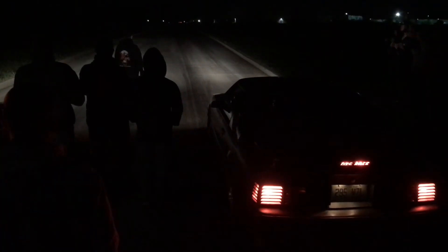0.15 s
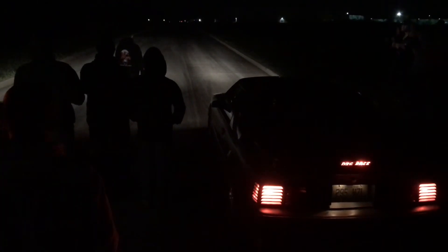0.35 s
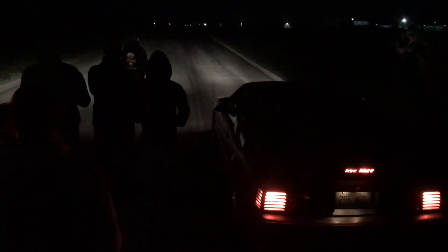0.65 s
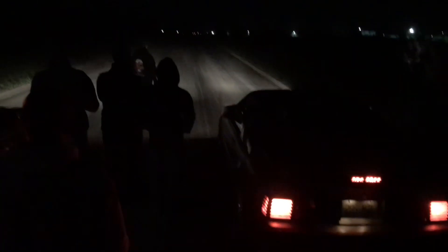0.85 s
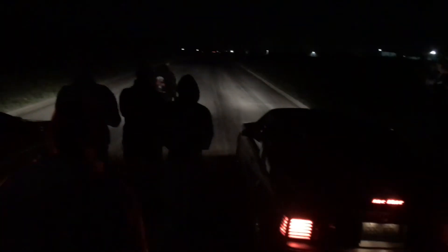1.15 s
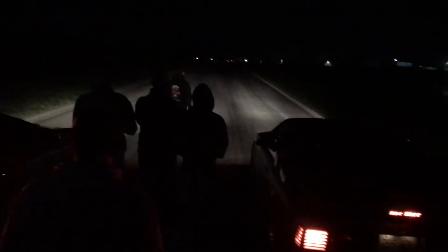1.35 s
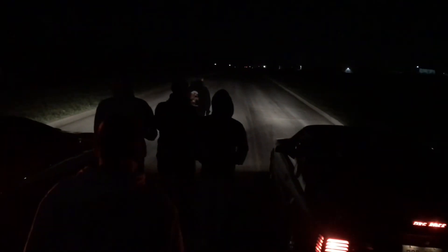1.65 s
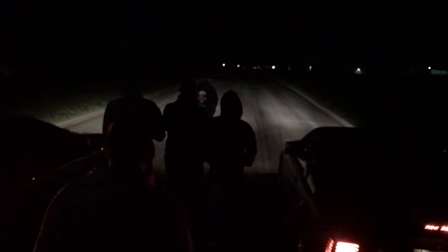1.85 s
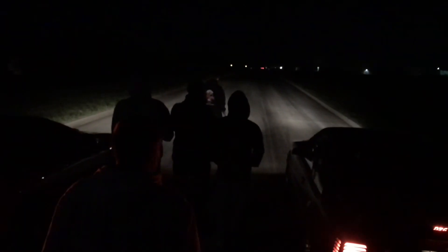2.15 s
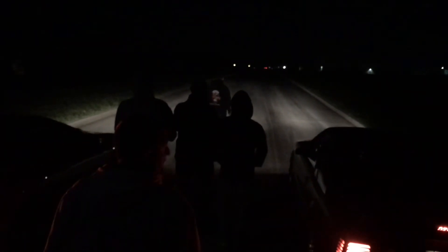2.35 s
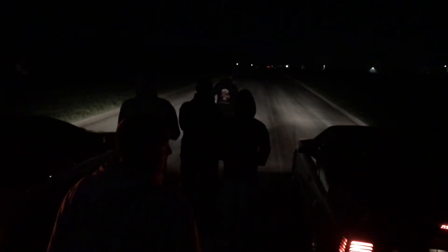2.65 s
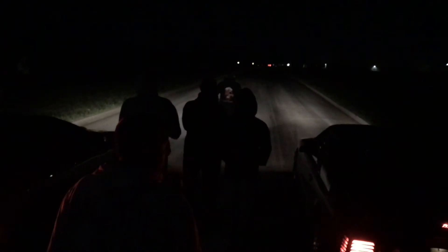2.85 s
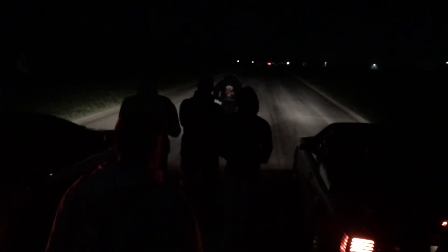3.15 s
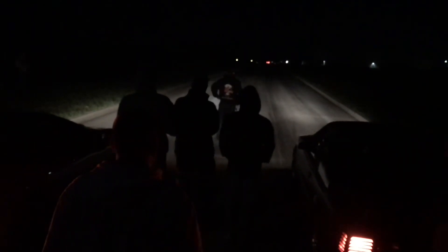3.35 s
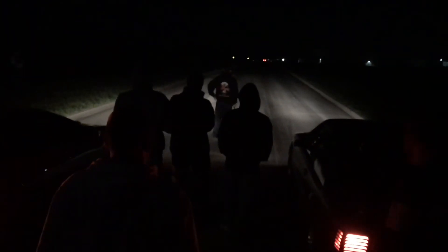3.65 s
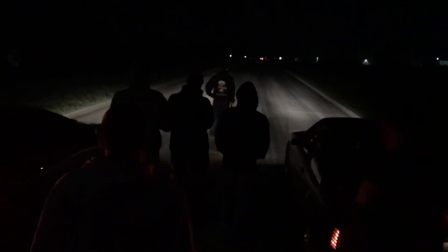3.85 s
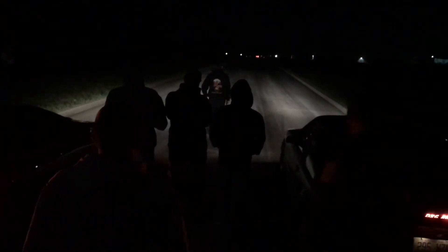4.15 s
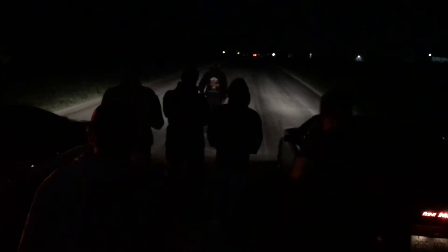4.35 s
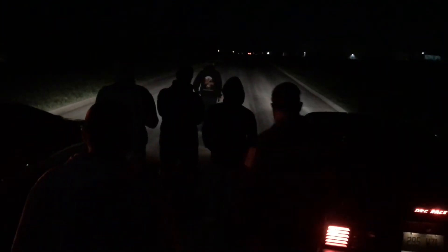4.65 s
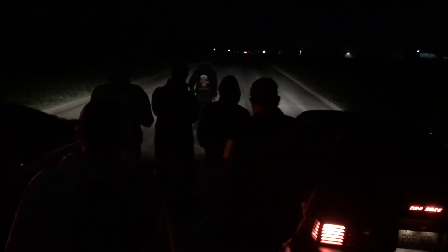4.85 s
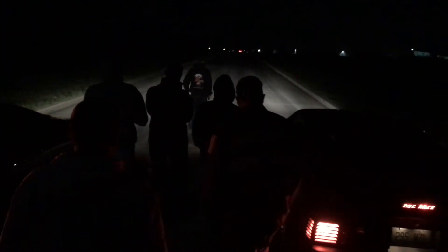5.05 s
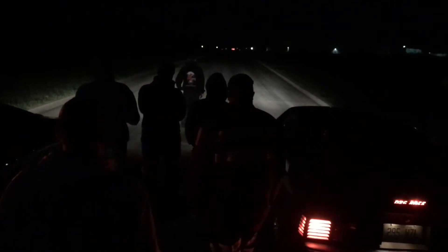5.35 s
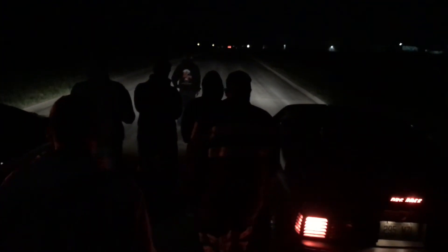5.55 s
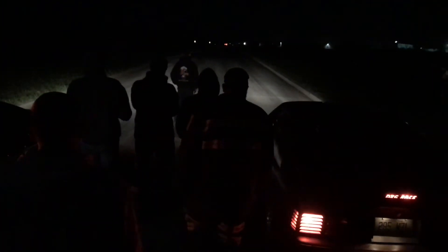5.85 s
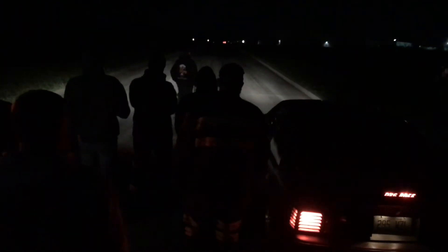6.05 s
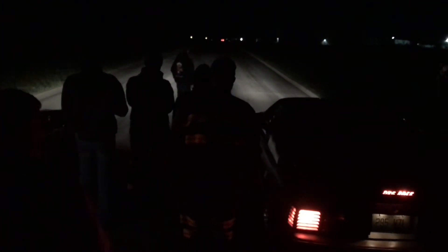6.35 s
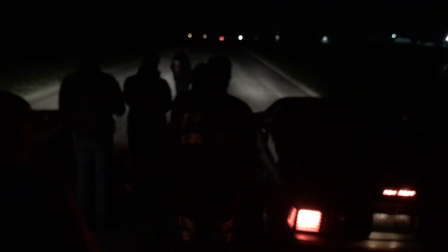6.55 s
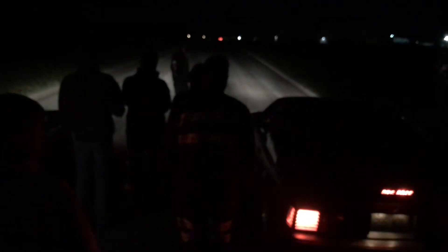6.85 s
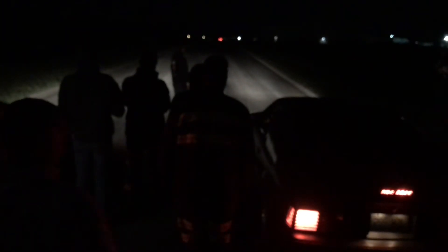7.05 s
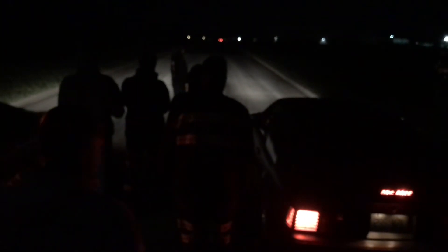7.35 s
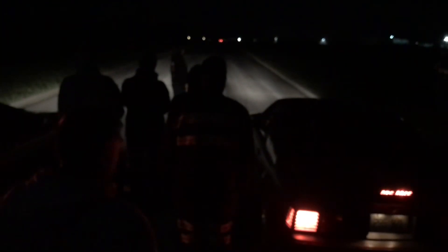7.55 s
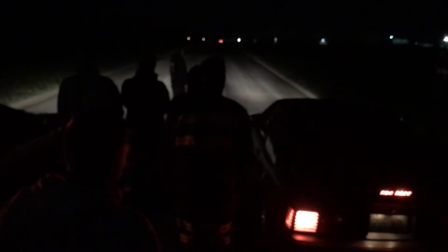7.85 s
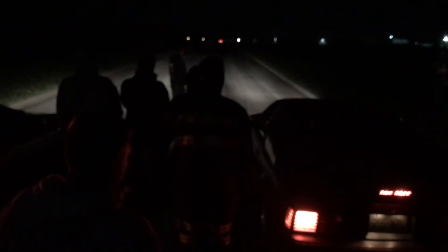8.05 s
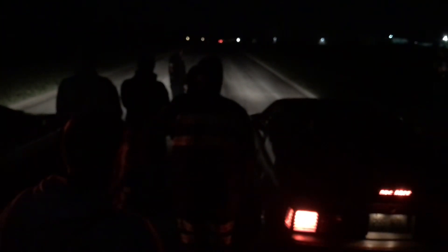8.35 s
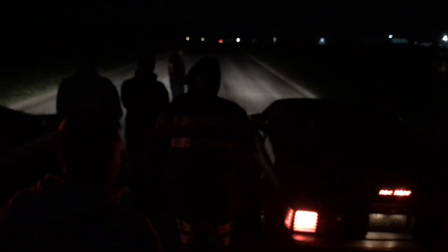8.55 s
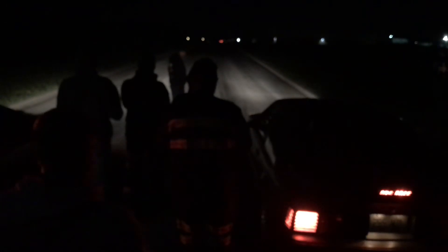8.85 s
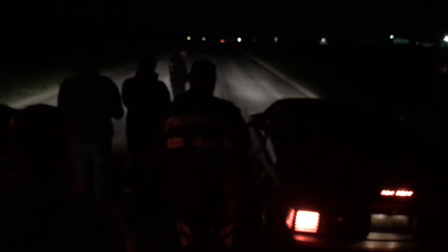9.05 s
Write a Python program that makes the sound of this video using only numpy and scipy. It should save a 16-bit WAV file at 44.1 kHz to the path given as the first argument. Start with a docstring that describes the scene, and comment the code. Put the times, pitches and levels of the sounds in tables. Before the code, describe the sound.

Outdoors on a night road, close behind two drag cars. One V8 drones, then gets two quick throttle blips, falls back, and barks twice more with a gap between, each rev dropping steadily with a soft gas hiss. Beside it another V8 rumbles unevenly with metallic clacks; after the last rev its loping, coughing idle takes over. The microphone is near the exhausts, with a short tail from the road.

```python
"""A V8 drag car on a road at night, heard from just behind, is blipped four times, barks and coasts down.
A second V8 beside it falls into a loping, coughing idle, with a metallic clatter about once an engine cycle.
Uneven firing pulses excite noise bursts, shaped by the spectra and resonances of the pipes; sine waves
that follow the firing rate add the exhaust notes. Struck metal, a hiss of gas and the scatter of the
road complete the scene."""
import sys
import numpy as np
from scipy import signal
from scipy.fft import rfft, irfft, next_fast_len
from scipy.io import wavfile
from scipy.ndimage import uniform_filter1d, map_coordinates

SR = 44100
rng = np.random.default_rng(int(sys.argv[2]) if len(sys.argv) > 2 else 0)


def materialize(psi):
    """Save the field psi as 16-bit PCM at rate SR to the path in sys.argv[1].

    A 1-D psi becomes a single channel; in a 2-D psi each row is a channel.
    """
    bounded = np.clip(np.atleast_2d(psi).T, -1, 1)
    quanta = np.round(bounded * 32767).astype(np.int16)
    wavfile.write(sys.argv[1], SR, quanta)


N = 405719

# All levels are relative: later gains or normalisation also act on them.
# throttle blips; the top speed is before flywheel rounding:
# half_open_s, half_shut_s, opening_time_s, top_speed_at_s, top_firing_rate_hz, tone_db, rasp_db
THROTTLE_BLIPS = [(1.171, 1.317, 0.13, 1.29, 226, -7.5, -23), (1.5, 1.626, .006, 1.605, 255.7, -11, -23.5),
                  (3.142, 3.321, .05, 3.31, 220.9, -5.5, -23), (4.834, 4.968, 0.089, 4.95, 231, -5, -23.5)]
# speed and effort of the revving car on a lightly held pedal: time_s, firing_rate_hz, effort_db
HELD_PEDAL = [(0, 127.5, -19.5), (.2, 72.83, -15), (.46, 71.86, -9.5), (.56, 85.6, -11), (.76, 96.6, -24),
              (.85, 104.5, -7.5), (1.02, 113.6, -10.5), (1.15, 110.1, -13), (1.4, 104.5, -28),
              (2.6, 72.12, -17), (3.11, 70.21, -13), (3.85, 108.8, -21.5), (3.94, 112.7, -8),
              (4.3, 114.5, -15), (4.8, 117, -12.5), (5.0, 112, -24.5), (5.58, 105, -14), (5.9, 70.97, -23),
              (9.2, 68.4, -23)]
# closed-throttle burble of the revving car, at 100 firings a second: time_s, level_db
BURBLE_LEVEL = [(0, -43), (.9, -32.5), (1.35, -46), (1.75, -39.5), (2.4, -44), (2.9, -38.5), (3.7, -42.5),
                (4.2, -43), (5.6, -44.5), (7, -37.5), (9.2, -37.5)]
# the mixture catching sharply in the pipe: start_s, level_db
PIPE_BANGS = [(1.499, -32), (3.16, -38)]
# strength of the cylinders in firing order: level_db
CYLINDER_PATTERN = [0, 0.17, 0, -1.4, 1.1, 0, -0.86, -0.75]
# how well the pipes carry a tone: pitch_hz, level_db
PIPE_TRANSMISSION = [(50, -6), (70, -3.5), (85, -3), (97, -8.5), (115, -0.5), (132, 0.5), (152, -6.5),
                     (175, -3.5), (205, -6), (221, -18.5), (260, -30)]
# tailpipe resonances: pitch_hz, width_hz, lift_db
PIPE_RESONANCES = [(339, 33, 3.5), (440, 150, 1), (595, 61, 6.5), (740, 50, 1.5), (1034, 100, 3),
                   (1126, 70, 4.5), (1173, 45, 3.5), (1365, 77, 5), (1644, 159.6, 6)]
# spectrum of the open-throttle rasp: pitch_hz, level_db (per Hz)
RASP_SPECTRUM = [(150, -27), (250, -6), (325, -4.5), (551, -13), (601, -10), (673, -14), (843, -8.5),
                 (944, -10), (1140, -12.5), (1500, -20.5), (1680, -16.5), (2450, -24.5), (5000, -38),
                 (6500, -57), (11000, -120)]
# spectrum of the closed-throttle burble: pitch_hz, level_db (per Hz)
BURBLE_SPECTRUM = [(180, -26), (300, -1), (443, -8.5), (655, -10.5), (726, -7), (797, -10), (856, -5.5),
                   (968, -11.5), (1150, -11.5), (1270, -17.5), (1570, -21), (2420, -30), (3500, -29),
                   (4550, -46), (7700, -120)]
# spectrum of the exhaust's chest: pitch_hz, level_db (per Hz)
THROAT_SPECTRUM = [(200, -39.5), (290, 9.5), (370, 2.5), (460, -10), (650, -38.5)]
# spectrum of the open-throttle crackle: pitch_hz, level_db (per Hz)
CRACKLE_SPECTRUM = [(1470, -31.5), (2500, -3.5), (4380, -5.5), (4910, -13), (5430, -7.5), (6940, -8.5),
                    (10700, -21.5), (12500, -18), (15600, -27)]
# spectrum of the rustle with the throttle shut: pitch_hz, level_db (per Hz)
OVERRUN_SPECTRUM = [(530, -28), (900, -14), (1120, 3), (1240, -6), (1750, -8.5), (2250, -11.5), (4500, -24),
                    (5850, -39), (9900, -120)]
# speed of the idling car: time_s, firing_rate_hz
IDLE_SPEED = [(0, 90), (2.4, 90), (3, 92), (5.5, 92), (5.8, 87.2), (6.85, 89.7), (6.93, 98.3), (7.6, 98.4),
              (7.85, 101), (8.2, 97.5), (8.6, 97.3), (9.2, 92.5)]
# loudness of the idling car: time_s, rumble_db, firing_tone_db, mutter_db
IDLE_LOUDNESS = [(0, -17, -43, -40), (.9, -14.5, -48, -45), (1.3, -21, -36, -48), (2.4, -20.5, -36, -48),
                 (3, -13.5, -31, -42), (3.4, -19, -51, -45.5), (5.4, -22, -42, -47.5), (6, -15, -27, -45),
                 (6.6, -14.5, -23, -39), (7.6, -14, -18, -38.5), (9.2, -13.5, -19.5, -41)]
# spectrum of the idle rumble: pitch_hz, level_db (per Hz)
RUMBLE_SPECTRUM = [(15, -54), (25, -36), (32, -14.5), (54, -10), (112, -0.5), (134, -2), (155, -11),
                   (173, -3.5), (191, -9), (218, -16.5), (237, -28), (274, -24), (317, -25), (450, -46),
                   (580, -55.5), (990, -120)]
# boom of the idling car's pipes: pitch_hz, width_hz, lift_db
IDLE_BOOM = [(64.5, 11.5, 11), (128.7, 23, 4), (156.6, 28, 0.5)]
# stray coughs, strong and faint, before the lope sets in: start_s, level_db
STRAY_COUGHS = [(.446, -29), (.635, -32), (1.105, -35), (2.937, -38), (2.982, -42), (3.935, -30),
                (4.768, -35)]
# spectrum of the chuff in each cough: pitch_hz, level_db (per Hz)
COUGH_SPECTRUM = [(260, -27), (450, -14), (519, 0.5), (667, -4.5), (804, -1.5), (1030, 1), (1240, -2.5),
                  (2000, -13.5), (2600, -22), (4400, -120)]
# pipe modes rung by a cough: pitch_hz, level_db, t60_s
COUGH_MODES = [(617, -3, 0.097), (717, 0, 0.072), (850, -1.5, 0.045), (1070, -13, 0.033)]
# single metallic clacks at set times, hard and soft: start_s, level_db
CLACKS = [(0.144, -30.5), (.218, -31.5), (.449, -27), (0.629, -27.5), (.706, -27.5), (.783, -25.5),
          (0.871, -25.5), (.976, -28), (1.07, -30), (2.295, -31), (2.379, -30.5), (2.535, -27), (2.62, -33),
          (2.696, -32), (2.759, -30.5), (2.835, -27.5), (2.893, -27.5), (2.984, -27), (3.465, -30.5),
          (3.538, -34), (3.626, -42), (3.703, -30), (4.063, -37), (4.143, -39), (4.22, -35), (4.309, -31),
          (4.385, -36), (4.475, -35), (4.551, -32.5), (4.669, -32.5), (5.35, -31), (5.435, -32.5),
          (5.525, -38), (5.587, -31), (5.689, -39), (5.747, -28), (5.788, -29.5), (5.919, -36),
          (5.976, -26), (6.121, -34.5), (6.207, -29), (6.684, -29), (7.407, -27.5), (7.451, -28),
          (7.495, -30), (7.644, -29), (7.697, -27.5), (7.739, -28), (7.829, -26), (7.904, -24),
          (7.976, -25), (8.065, -25), (8.166, -28), (8.306, -26.5), (8.407, -29.5), (8.454, -28),
          (8.647, -27.5), (8.691, -26), (8.865, -27.5), (8.923, -23.5)]
# strength of the engine's mechanical noise and gas: time_s, rattle_db, gas_hiss_db
ENGINE_NOISE = [(0, -33.5, -47.5), (.8, -36, -44.5), (1.2, -35.5, -51), (2.1, -43.5, -51),
                (2.8, -29.5, -47.5), (3.4, -38, -46), (4.2, -36.5, -60), (5.3, -40, -51.5),
                (6.3, -37.5, -49.5), (6.8, -35.5, -48.5), (7.8, -30, -46), (8.8, -34, -46.5),
                (9.2, -35.5, -50.5)]
# spectrum of the clatter: pitch_hz, level_db (per Hz)
CLATTER_SPECTRUM = [(1760, -28), (3000, -4), (3490, -9.5), (3790, -2.5), (4090, -9), (4930, -7),
                    (5470, -1.5), (6030, -8), (6970, -7.5), (7840, -14), (9380, -7.5), (10700, -13),
                    (11700, -10.5), (13600, -17), (15600, -21)]
# ringing of the hot metal: pitch_hz, width_hz, lift_db
METAL_RESONANCES = [(3700, 200, -1), (5600, 450, 1), (8880, 1100, 3.5)]
# spectrum of the gas hiss: pitch_hz, level_db (per Hz)
HISS_SPECTRUM = [(880, -20), (1450, 0), (2000, -3.5), (3100, -10.5), (6000, -13), (10800, -27.5),
                 (15600, -31)]
# decay of the scatter from the street: pitch_hz, t60_s
STREET_DECAY = [(100, 0.57), (1000, 0.16), (10000, 0.075)]

TOP_HZ = 15800  # upper band limit
SPIN_UP_HZ_PER_S, COAST_HZ_PER_S, FLYWHEEL_S = 780, 222, .1  # firing rate gained, lost; rounding of the turn
BANK_DB, BANK_COAST_DB, BANK_LOAD_DB = -37.5, -16.5, -18  # bank tone: steady, running down, under load
COAST_FROM_HZ, COAST_SPAN_HZ = 113.4, 28.02  # firing rates over which the coasting bank tone comes in
CHOKE_S, CHOKE_DEPTH = 0.15, 0.68  # the note is choked for a moment when the throttle snaps shut
LOPE_START_S = 5.809  # from here the idling car coughs once an engine cycle
LOPE_DB, LOPE_WEAK_DB, LOPE_SCATTER_DB = -28, -8.5, 1.5  # strong and weak coughs take turns; unevenness
OFFBEAT_DB, RATTLE_SCATTER_DB, RATTLE_JITTER_S = -5.5, 4.1, .004  # every other rattle is weaker; unevenness
VALVES_DB, CLEAR_S = -22.5, .055  # chatter relative to the rattle; pause of the rattle round a single clack
BLOW_OFF_DB, BLOW_OFF_RISE_S, BLOW_OFF_T60_S = -42, 0.13, 2.82  # boost vented after each blip


def revving_car():
    """Source superposition: a tonal note and turbulent noise share one speed and one throttle."""
    held_hz, effort_db = curves(HELD_PEDAL)
    rate_hz = engine_speed(held_hz)
    blips = throttle(closing=0.064)
    load = np.clip(blips.sum(axis=0), 0, 1)
    coasting = np.clip((rate_hz - COAST_FROM_HZ) / COAST_SPAN_HZ, 0, 1)
    pulses = firings(rate_hz, scatter_db=2.5, jitter=0.032, bank_lag=.08)
    echoing = smeared(pulses, t60=0.03)
    note = exhaust_note(rate_hz, effort_db, blips, coasting)
    voice = bark_and_bangs(pulses, echoing, blips) + burble(pulses, echoing, rate_hz, load)
    noises = growl(pulses, rate_hz, load) + crackle(pulses, rate_hz, load) + overrun(pulses, rate_hz, load)
    return note + voice + noises


def engine_speed(held_hz):
    """Rotational inertia: each blip spins up fast, then coasts steadily to the speed the pedal holds."""
    t = np.arange(N) / SR
    speeds = [held_hz]
    for *_, top_s, top_hz, _, _ in THROTTLE_BLIPS:
        shortfall = np.maximum(SPIN_UP_HZ_PER_S * (top_s - t), COAST_HZ_PER_S * (t - top_s))
        speeds.append(top_hz - shortfall)
    return uniform_filter1d(np.max(speeds, axis=0), int(FLYWHEEL_S * SR))


def throttle(closing):
    """Flow control: linear ramps give the throttle opening, 0-1, for each blip."""
    t = np.arange(N) / SR

    def ramp(u):
        return np.clip(u + .5, 0, 1)

    return np.array([ramp((t - on) / opening) * ramp((off - t) / closing)
                     for on, off, opening, *_ in THROTTLE_BLIPS])


def since_shut():
    """Relaxation clock: for each blip, the seconds since the throttle shut; 0 before that."""
    shut_s = np.array([[off] for _, off, *_ in THROTTLE_BLIPS])
    return np.maximum(np.arange(N) / SR - shut_s, 0)


def exhaust_note(rate_hz, effort_db, blips, coasting):
    """Engine orders: a firing tone grows with effort; uneven banks sound at three quarters of its pitch."""
    load = np.clip(blips.sum(axis=0), 0, 1)
    since = since_shut()
    choked = np.max((since > 0) * np.exp(-(since / CHOKE_S) ** 4), axis=0)
    shut = (1 - load) * (1 - CHOKE_DEPTH * choked)
    blip_gains = amp([tone_db for *_, tone_db, _ in THROTTLE_BLIPS])
    firing = shut * amp(effort_db) + blip_gains @ blips
    bank = amp(BANK_DB) + amp(BANK_COAST_DB) * coasting * shut + amp(BANK_LOAD_DB) * load
    firing_tone = pipe_tone(rate_hz, flutter_db=1.73, overtone_db=-36)
    bank_tone = pipe_tone(rate_hz * 3 / 4, flutter_db=2.5, overtone_db=-31)
    return firing * firing_tone + bank * bank_tone


def bark_and_bangs(pulses, echoing, blips):
    """Resonant excitation: pulses and turbulence ring the pipe at open throttle and in sharp bangs."""
    excitation = 0.35 * unit(pulses) + 1.2 * echoing + puffs(pulses, t60=0.063)
    bark = steady(coloured(excitation, RASP_SPECTRUM, PIPE_RESONANCES), span=0.016)
    rasp = amp([db for *_, db in THROTTLE_BLIPS]) @ blips * bark
    bangs = amp(-3) * bursts(PIPE_BANGS, attack=.0006, t60=0.11) * bark
    return rasp + bangs


def burble(pulses, echoing, rate_hz, load):
    """Resonant excitation: with the throttle shut, pulses and turbulence burble, louder with speed."""
    level_db, = curves(BURBLE_LEVEL)
    excitation = 0.13 * unit(pulses) + 0.27 * echoing + puffs(pulses, t60=0.081)
    sound = steady(coloured(excitation, BURBLE_SPECTRUM, PIPE_RESONANCES), span=0.059)
    return amp(level_db) * (rate_hz / 100) ** 0.83 * (1 - load) * sound


def growl(pulses, rate_hz, load):
    """Band resonance: the chest of the exhaust growls, more with speed and load."""
    sound = steady(coloured(unit(pulses) + puffs(pulses, t60=0.037), THROAT_SPECTRUM), span=0.042)
    return amp(-44 + 12.23 * load) * (rate_hz / 150) ** 0.3 * sound


def crackle(pulses, rate_hz, load):
    """Turbulence noise: open-throttle puffs crackle, swelling as the engine gathers speed."""
    noise = coloured(puffs(pulses, t60=0.14), CRACKLE_SPECTRUM, METAL_RESONANCES)
    return amp(-39.5) * load * (rate_hz / 180) ** 0.12 * steady(noise, span=0.078)


def overrun(pulses, rate_hz, load):
    """Flow noise: with the throttle shut the pipes rustle, fading with engine speed."""
    noise = steady(coloured(puffs(pulses, t60=0.026), OVERRUN_SPECTRUM), span=0.052)
    return amp(-43.5) * (1 - load) * (rate_hz / 200) ** 2.07 * noise


def firings(rate_hz, scatter_db, jitter, bank_lag):
    """Phase accumulation: one pulse per firing, patterned by cylinder; weaker cylinders arrive late."""
    turns = np.cumsum(rate_hz) / SR
    k = np.arange(1, int(turns[-1]))
    chance = rng.standard_normal((len(k), 2))
    pattern_db = np.take(CYLINDER_PATTERN, k, mode="wrap")
    # jitter and lag are fractions of a firing interval
    at = np.searchsorted(turns, k + jitter * chance[:, 0] + bank_lag * (pattern_db < 0))
    return np.bincount(at, amp(pattern_db + scatter_db * chance[:, 1]), N + 1)[:N]


def puffs(pulses, t60):
    """Turbulent decay: each pulse releases noise whose power dies away exponentially."""
    t = np.arange(SR // 5) / SR
    power = signal.fftconvolve(pulses ** 2, amp(-60 * t / t60) ** 2)[:N]
    return unit(np.sqrt(np.abs(power)) * rng.standard_normal(N))


def smeared(pulses, t60):
    """Multiple reflection: the exhaust gives every pulse the same short, dense tail."""
    t = np.arange(SR // 8) / SR
    tail = rng.standard_normal(len(t)) * amp(-60 * t / t60)
    return unit(signal.fftconvolve(pulses, tail)[:N])


def pipe_tone(hz, flutter_db, overtone_db):
    """Frequency response: one fluttering engine order is as loud as the pipes carry its pitch."""
    turns = np.cumsum(hz) / SR
    # a new random level every two turns, interpolated smoothly
    flutter = flutter_db * map_coordinates(rng.standard_normal(N // 50), [turns / 2])
    wave = np.sin(2 * np.pi * turns) + amp(overtone_db) * np.sin(2 * np.pi * 2 * turns)
    return np.sqrt(2) * amp(along(PIPE_TRANSMISSION, hz) + flutter) * wave


def idling_car():
    """Irregular excitation: a big cam makes firings uneven; the pipe rumbles, mutters and coughs."""
    rate_hz, = curves(IDLE_SPEED)
    rumble_db, tone_db, mutter_db = curves(IDLE_LOUDNESS)
    pulses = firings(rate_hz, scatter_db=4.5, jitter=0.12, bank_lag=0.27)
    rumble = amp(rumble_db) * steady(coloured(pulses, RUMBLE_SPECTRUM, IDLE_BOOM), span=0.11)
    tone = amp(tone_db) * pipe_tone(rate_hz, flutter_db=5.0, overtone_db=-18)
    muttering = coloured(puffs(pulses, t60=0.04), BURBLE_SPECTRUM, PIPE_RESONANCES)
    mutter = amp(mutter_db) * steady(muttering, span=0.2)
    events = list(STRAY_COUGHS) + lope(rate_hz)
    chuff_noise = steady(coloured(puffs(pulses, t60=0.18), COUGH_SPECTRUM), span=0.0054)
    chuffs = amp(-7.5) * bursts(events, attack=0.0006, t60=0.3) * chuff_noise
    return rumble + tone + mutter + chuffs + coughs(events, spread=0.04, level_db=-1)


def lope(rate_hz):
    """Cyclic variation: (start_s, level_db) of a cough each eight firings, strong and weak in turn."""
    events = []
    for k, s in enumerate(every(rate_hz, LOPE_START_S, count=8)):
        events.append((s, LOPE_DB + LOPE_WEAK_DB * (k % 2) + LOPE_SCATTER_DB * rng.standard_normal()))
    return events


def coughs(events, spread, level_db):
    """Modal ringing: each cough rings the pipe briefly, a little differently each time."""
    out, t = np.zeros(N + SR), np.arange(SR // 6) / SR
    for s, db in events:
        for hz, mode_db, t60 in COUGH_MODES:
            detune, phase = rng.standard_normal(2)
            ring = np.sin(2 * np.pi * (hz * (1 + spread * detune) * t + phase))
            envelope = amp(db + level_db + mode_db - 60 * t / t60) * (1 - np.exp(-t / 0.00099))
            out[round(s * SR):][:len(t)] += envelope * ring
    return out[:N]


def clatter():
    """Impact excitation: valve gear chatters at the firing rate along with separate clacks."""
    rate_hz, = curves(IDLE_SPEED)
    rattle_db, _ = curves(ENGINE_NOISE)
    taps = firings(rate_hz, scatter_db=6.5, jitter=.25, bank_lag=.1)
    ringing = .65 * pings(taps, t60=.028, count=7)
    metal = coloured(ringing + puffs(taps, t60=0.14), CLATTER_SPECTRUM, METAL_RESONANCES)
    events = list(CLACKS) + rattles(rate_hz, rattle_db)
    clacks = amp(-12.0) * bursts(events, attack=0.0014, t60=0.15) * steady(metal, span=0.01)
    chatter = amp(rattle_db + VALVES_DB) * steady(metal, span=0.26)
    return clacks + chatter


def rattles(rate_hz, rattle_db):
    """Periodic impact: (start_s, level_db) of a clack each crank turn, pausing round each single clack."""
    times = every(rate_hz, 0, count=4)
    chance = rng.standard_normal((len(times), 2))
    offbeat = np.arange(len(times)) % 2
    db = rattle_db[(times * SR).astype(int)] + OFFBEAT_DB * offbeat + RATTLE_SCATTER_DB * chance[:, 0]
    times = np.clip(times + RATTLE_JITTER_S * chance[:, 1], 0, N / SR)
    nearest_s = np.abs(times[:, None] - np.transpose(CLACKS)[0]).min(axis=1)
    clear = nearest_s > CLEAR_S
    return list(zip(times[clear], db[clear]))


def pings(taps, t60, count):
    """Modal superposition: each tap rings a few of the metal's many high modes."""
    at = np.repeat(np.flatnonzero(taps), count)
    hz = rng.uniform(METAL_RESONANCES[0][0], TOP_HZ, (len(at), 1))
    k = np.arange(SR // 60)
    rings = taps[at, None] * np.sin(2 * np.pi * hz * k / SR) * amp(-60 * k / SR / t60)
    return unit(np.bincount((at[:, None] + k).ravel(), rings.ravel(), N)[:N])


def gas_rush():
    """Jet noise: gas hisses softly, swelling as boost is vented each time the throttle shuts."""
    _, hiss_db = curves(ENGINE_NOISE)
    since = since_shut()
    vented = amp(BLOW_OFF_DB - 60 * since / BLOW_OFF_T60_S) * (1 - np.exp(-since / BLOW_OFF_RISE_S))
    level = np.hypot(amp(hiss_db), np.linalg.norm(vented, axis=0))  # powers add
    return level * unit(coloured(rng.standard_normal(N), HISS_SPECTRUM))


def street(x):
    """Diffuse scattering: the road and the cars return a short tail, its decay set by frequency."""
    hz, t, z = signal.stft(rng.standard_normal(SR // 2), SR, nperseg=256)
    decay = amp(-60 * t / along(STREET_DECAY, hz)[:, None])
    tail = signal.istft(z * decay, SR, nperseg=256)[1]
    return signal.fftconvolve(x, tail / np.linalg.norm(tail))[:N]


def amp(db):
    """Logarithmic level: decibels to gain."""
    return 10 ** (np.asarray(db) / 20)


def unit(x):
    """Power normalisation: x at rms 1."""
    return x / np.sqrt(np.mean(x ** 2) + 1e-20)


def steady(x, span):
    """Running power normalisation: x at about rms 1, averaged twice over span seconds."""
    size = max(int(span * SR), 8)
    power = uniform_filter1d(uniform_filter1d(x ** 2, size), size)
    return x / np.sqrt(np.abs(power) + 1e-12)


def along(points, hz):
    """Logarithmic frequency scale: (pitch_hz, value) points, interpolated."""
    f, v = np.transpose(points)
    return np.interp(np.log(hz + 1), np.log(f + 1), v)


def curves(rows):
    """Linear interpolation: one value per sample for each column after the time."""
    s, *cols = np.transpose(rows)
    return [np.interp(np.arange(N) / SR, s, c) for c in cols]


def every(rate_hz, start, count):
    """Inverse phase: the times of every count-th firing from start on."""
    t = np.arange(N) / SR
    turns = np.cumsum(rate_hz) / SR
    first = np.interp(start, t, turns)
    return np.interp(np.arange(first, turns[-1], count), turns, t)


def bursts(events, attack, t60):
    """Exponential decay: an envelope jumps and dies away at each (start_s, level_db) event."""
    envelope, t = np.zeros(N + SR), np.arange(SR // 4) / SR
    for s, db in events:
        start = max(round(s * SR), 0)
        envelope[start:][:len(t)] += amp(db - 60 * t / t60) * (1 - np.exp(-t / attack))
    return envelope[:N]


def coloured(x, spectrum, resonances=()):
    """Minimum-phase filtering: a causal response has this spectrum, lifted at the resonances."""
    m = 2 * next_fast_len(N // 2 + SR // 4)
    hz = np.fft.rfftfreq(m, 1 / SR)
    lifts = sum(lift / (1 + (2 * (hz - f) / width) ** 2) for f, width, lift in resonances)
    db = along(spectrum, hz) + lifts
    # folding the cepstrum onto positive time makes the filter causal
    cepstrum = irfft(np.log(np.maximum(amp(db), 1e-6)), m)
    cepstrum[1:m // 2] *= 2
    cepstrum[m // 2 + 1:] = 0
    return irfft(rfft(x, m) * np.exp(rfft(cepstrum)), m)[:N]


def scene():
    """Linear superposition: both cars in the open air; the road scatters their higher sounds."""
    cars = revving_car() + idling_car() + clatter() + gas_rush()
    scattered = coloured(cars, [(150, -14), (400, 2.5)])  # pitch_hz, level_db
    return (cars + amp(-12.5) * street(scattered))[None]


def record(dry):
    """Saturation and band limiting: the highest peaks are rounded, then all above TOP_HZ is removed."""
    held = dry / (1 + np.abs(dry) ** 6) ** (1 / 6)
    m = next_fast_len(N + SR // 2)
    passed = np.fft.rfftfreq(m, 1 / SR) < TOP_HZ
    return irfft(rfft(held, m) * passed, m)[..., :N]


dry = scene()
out = record(dry)
materialize(out)
```